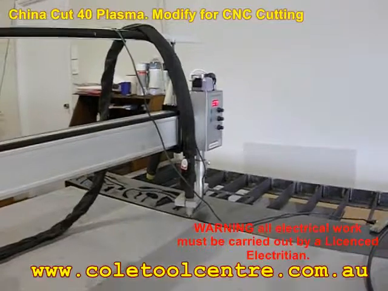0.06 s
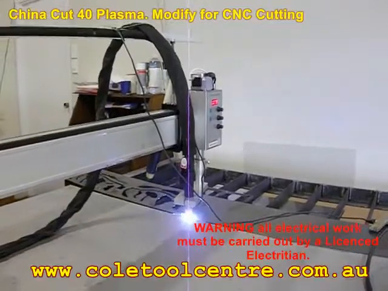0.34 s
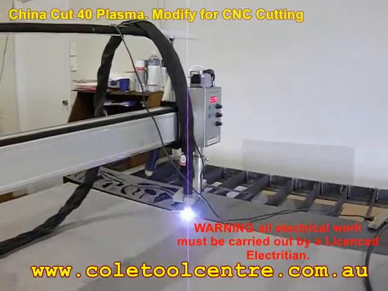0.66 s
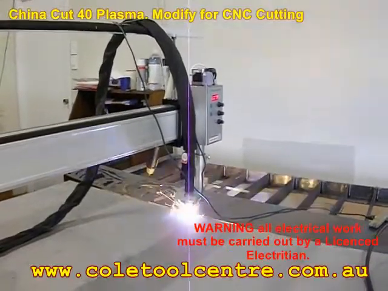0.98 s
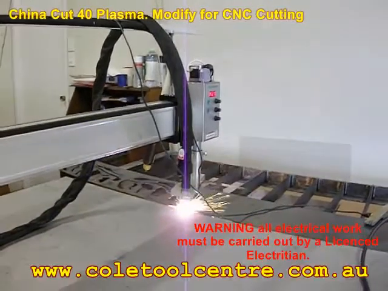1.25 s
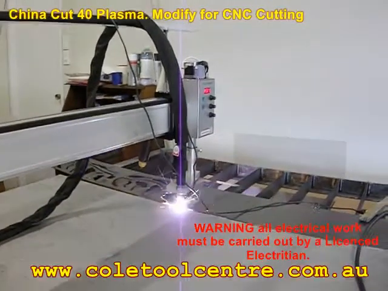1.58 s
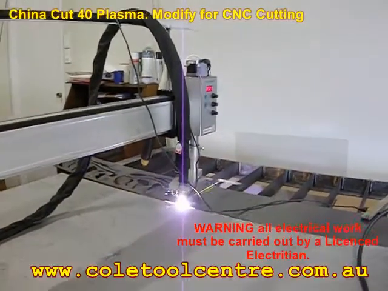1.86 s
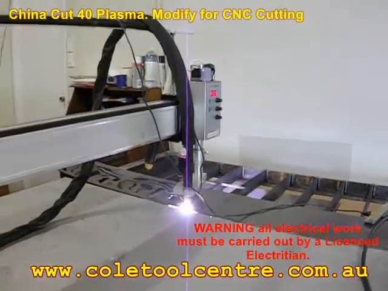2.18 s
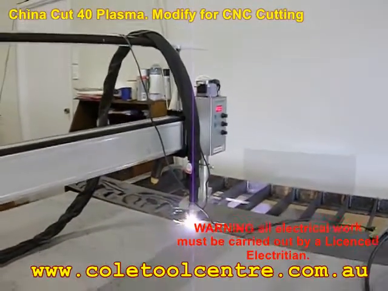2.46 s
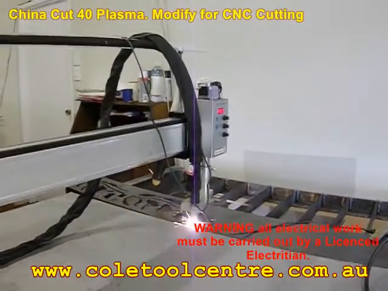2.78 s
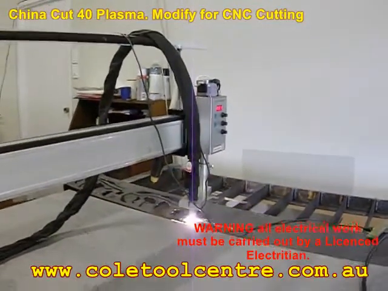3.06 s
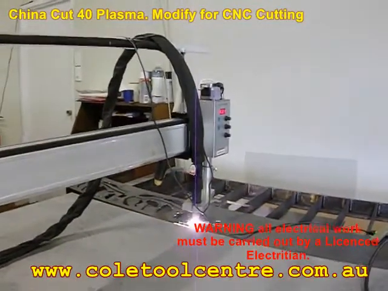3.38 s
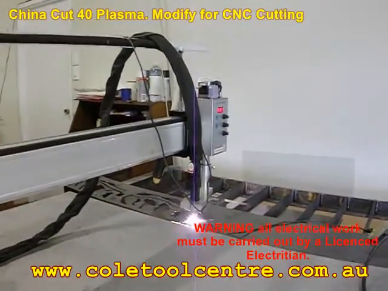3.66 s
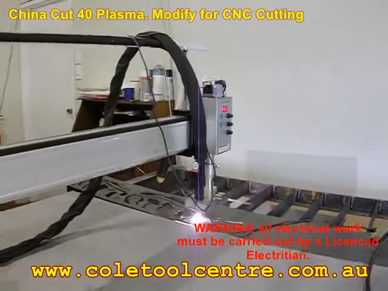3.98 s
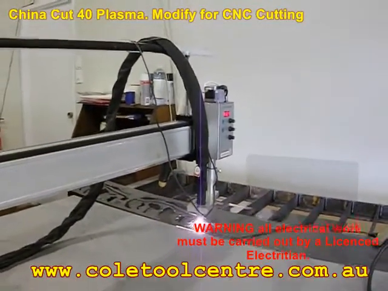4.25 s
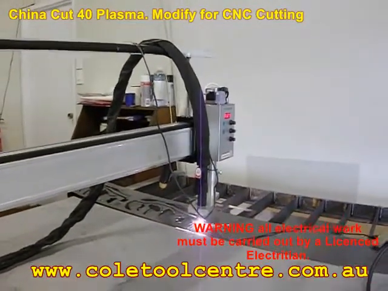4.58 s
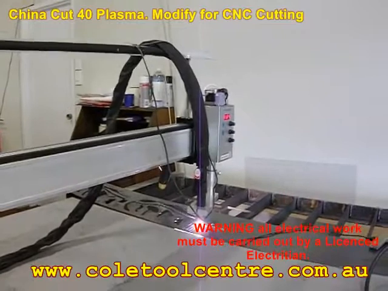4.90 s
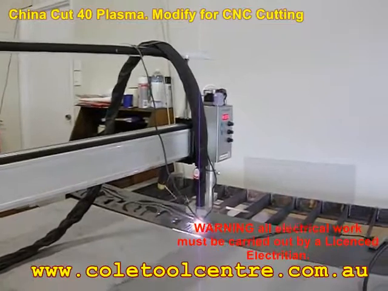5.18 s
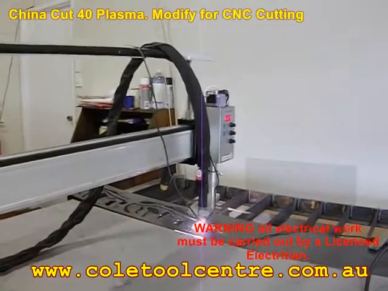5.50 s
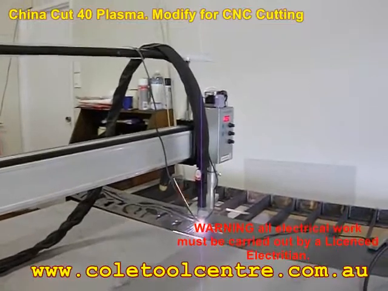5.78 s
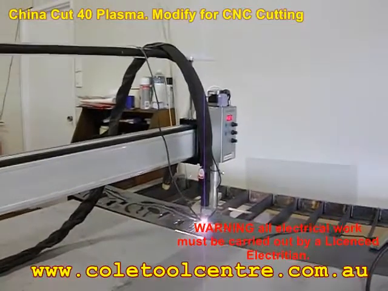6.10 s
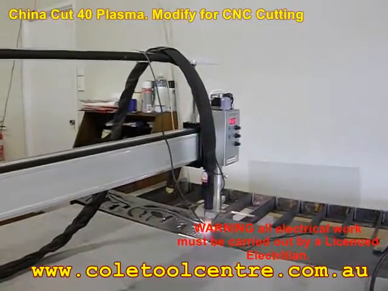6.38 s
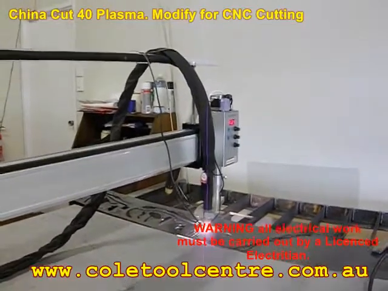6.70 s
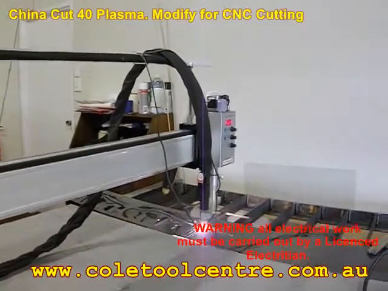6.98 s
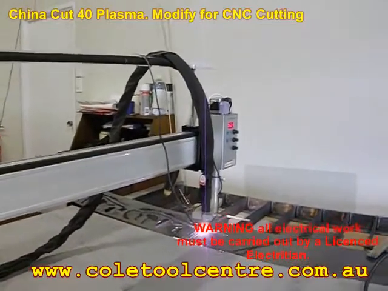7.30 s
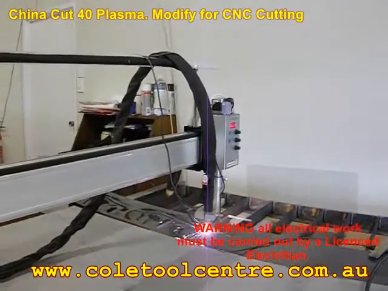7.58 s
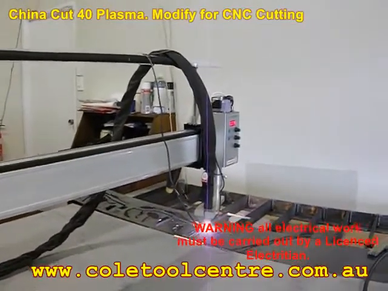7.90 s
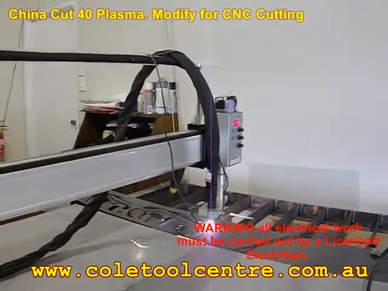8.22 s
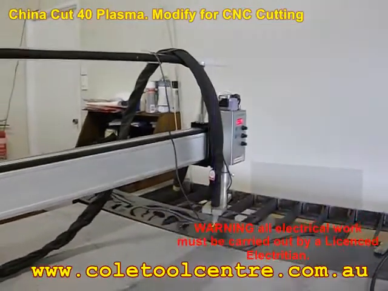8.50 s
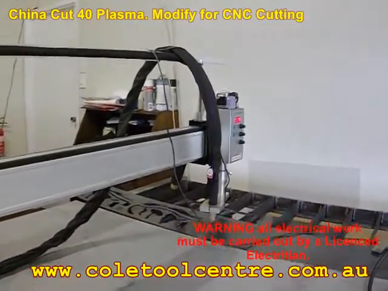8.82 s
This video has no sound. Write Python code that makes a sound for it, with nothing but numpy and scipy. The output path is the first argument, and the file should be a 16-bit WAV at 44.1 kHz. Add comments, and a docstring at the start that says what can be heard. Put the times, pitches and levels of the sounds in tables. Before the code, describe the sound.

A low puff of draught hits the microphone and an air valve clacks. A plasma torch lights almost at once and cuts steel plate with a loud, bright hiss that surges and spits, the metal ringing along. Near the end the arc goes out and the air blows on, smoother and duller. Gusts keep thumping on the single microphone in a slightly echoing workshop.

```python
"""First comes a low puff of draught on the microphone and the clack of an air valve opening.
Air rushes from a plasma torch, its arc strikes, and the hot jet hisses, surging and spitting as it
cuts a steel plate. The steel rings along and the workshop echoes. Near the end the arc goes out and
the air blows on, duller. Gusts keep buffeting the single microphone, over steady workshop noise."""
import sys
import numpy as np
from scipy import signal
from scipy.fft import rfft, irfft, next_fast_len
from scipy.io import wavfile
from scipy.ndimage import uniform_filter1d

SR = 44100
rng = np.random.default_rng(int(sys.argv[2]) if len(sys.argv) > 2 else 0)


def generate_wav(sig):
    """Save sig (samples, or channels by samples) to the path in sys.argv[1] as 16-bit PCM at SR."""
    pcm = np.round(np.clip(np.atleast_2d(sig).T, -1, 1) * 32767).astype(np.int16)
    wavfile.write(sys.argv[1], SR, pcm)


N = 399105
TIME = np.arange(N) / SR
ARC_ON_S, ARC_OFF_S = 0.2994, 8.49

# strength of the jet along the cut: (time [s], relative level [dB])
JET_LEVELS = [(0.31, -20.5), (0.65, -18.5), (1.0, -20.5), (1.3, -18.5), (1.65, -21), (2.2, -20),
              (2.52, -22.5), (2.72, -20), (3.7, -20.5), (3.92, -22), (4.3, -19.5), (4.7, -19.5),
              (4.96, -23), (5.1, -20.5), (6.75, -19.5), (7.0, -20.5), (7.9, -21), (9.05, -21)]
# the strongest flares of the jet: (time [s], rise [dB])
JET_FLARES = [(0.522, 2.5), (0.708, 1.5), (1.908, 2), (1.985, 2.5), (2.219, 1.5), (2.771, 3), (3.045, 2.3),
              (3.856, 2.2), (4.344, 2.5), (4.752, 2.5), (4.899, 4), (5.482, 2.5), (6.161, 2), (6.388, 1.5),
              (7.189, 3.5), (7.872, 2), (7.953, 3.5), (8.353, 3.5)]
# brief dips in the hiss: (time [s], depth [dB])
JET_DIPS = [(0.78, 1.5), (4.83, 1.5), (6.06, 1.5), (6.95, 1.5), (8.05, 3), (8.56, 3), (8.85, 2.5)]
# the hiss of the lit torch: (frequency [Hz], relative level [dB])
ARC_SPECTRUM = [(400, -21), (800, -15), (1100, -8.5), (1950, -3.5), (2200, -5.5), (2800, -3), (3450, -4.5),
                (4300, -1.6), (5300, 0), (5800, -1.5), (6800, 0), (8500, -3), (9200, -2.8), (9800, -5),
                (10400, -5), (11000, -12.5), (11800, -19.5), (14000, -43)]
# the air after the arc goes out: (frequency [Hz], relative level [dB])
AIR_SPECTRUM = [(500, -10), (900, -10.5), (1500, -4), (2300, -3.5), (2800, -1), (3400, -2.5), (5000, 0.5),
                (5900, -3), (6700, -1), (7900, -5.5), (10300, -8.5), (11800, -24), (14000, -44)]
# notes of the hollow between nozzle and cut: (pitch [Hz], width [Hz], relative level [dB])
CAVITY_NOTES = [(2724, 89, -23.5), (4547, 260, -18), (5080, 140, -18.5), (7120, 140, -22.5),
                (8260, 190, -22.5), (9010, 260, -17.5)]
# clacks of the air valve: (time [s], relative peak [dB])
VALVE_CLACKS = [(0.114, -23), (0.1312, -16), (0.1334, -9)]
# the valve and the air before the arc: (frequency [Hz], relative level [dB])
VALVE_SPECTRUM = [(500, 4), (1100, -5), (2300, -3.5), (2800, 5.5), (3350, -5), (3850, 5.5), (4300, -3),
                  (5080, -1), (5600, -4), (7600, -9), (10300, -13), (11000, -23), (14000, -68)]
# ringing notes of the plate and its table: (pitch [Hz], width [Hz], gain [dB])
STEEL_NOTES = [(966, 20, -6), (1070, 16, 2.5), (1166, 8.1, -3), (1200, 11, -2.5), (1483, 36, -12),
               (1610, 18, -4), (1723, 17, -8.5), (2032, 15, -3), (2420, 7.3, -6), (2430, 16, -13),
               (3080, 37, -9), (3180, 25, -10.5), (3690, 9.8, -7), (4130, 44, -4), (4900, 34, -4),
               (6250, 17, -6), (8450, 40, -6)]
# the draught before its highs are faded: (frequency [Hz], relative level [dB])
DRAUGHT_SPECTRUM = [(15, -11), (45, -2), (130, -0.5), (300, -1.5), (600, -2.5), (1500, 2)]
# gusts: (start [s], length [s], relative level [dB], upper edge of the sound [Hz])
DRAUGHT_GUSTS = [(0.095, 0.13, -21.5, 290), (0.966, 0.085, -30, 340), (1.214, 0.21, -24, 524),
                 (1.53, 0.23, -26, 500), (2.47, .26, -27.5, 393), (3.37, 0.47, -26.5, 520),
                 (4.7, 0.28, -30, 344), (5.203, 0.055, -29, 310), (5.926, 0.39, -28.5, 367),
                 (7.258, 0.25, -26.5, 450), (7.767, 0.046, -29, 380), (8.22, 0.18, -28.5, 280),
                 (8.5, 0.11, -22.5, 305), (8.95, .1, -29, 240)]
# the weaker draught between gusts: (time [s], relative level [dB])
DRAUGHT_LULL = [(0, -24.5), (0.4, -42), (0.8, -43.5), (1.8, -35), (2.15, -36.5), (3.0, -36.5), (3.2, -36),
                (4.6, -33.5), (5.45, -39), (5.7, -33), (6.5, -41), (6.95, -33), (8.07, -39), (8.5, -31),
                (9.05, -33)]
# single hard thumps of the draught: (time [s], relative peak [dB], pitch [Hz])
DRAUGHT_THUMPS = [(0.107, -12.5, 81), (0.149, -14.5, 240), (0.206, -8, 108), (0.238, -19, 134),
                  (1.31, -15, 250), (1.749, -15, 393), (1.914, -14, 199), (2.086, -16, 230),
                  (2.185, -22, 199), (2.599, -12.5, 260), (2.731, -11.5, 346), (4.252, -18, 300),
                  (4.742, -13, 222), (4.932, -10.5, 315), (5.341, -17, 320), (5.921, -13.5, 308),
                  (6.31, -15, 190), (7.546, -9.5, 230), (7.811, -10, 417), (8.242, -11.5, 150),
                  (8.432, -9.5, 260), (8.627, -11, 387), (8.821, -9.5, 260)]
# steady noise of the workshop: (frequency [Hz], relative level [dB])
SHOP_SPECTRUM = [(30, 7.5), (120, -1), (350, -17.5), (1000, -1.5), (1400, -4.5), (2300, -14), (3500, -14.5),
                 (6000, -25), (10500, -33), (12000, -52)]


def jet(air_db, roar_db):
    """The arc makes the jet bright and unsteady; without it the air blows smooth and duller."""
    burning = 1 - ramp(ARC_OFF_S, 0.03)
    arc = arc_hiss(level_db=-1.13, spatter_db=-7.5, flutter_db=0.71, shimmer_db=-0.5)
    air = from_db(air_db) * smooth_noise(AIR_SPECTRUM)
    roar = from_db(roar_db) * noise_band(450, 1000)   # the largest swirls of air
    level = from_db(in_time(JET_LEVELS) + surges()) * ramp(ARC_ON_S, 0.006)
    return level * (np.sqrt(burning) * arc + np.sqrt(1 - burning) * air + roar)


def arc_hiss(level_db, spatter_db, flutter_db, shimmer_db, pierced_s=1.26, dull_db=4):
    """The lit jet hisses and spits; its highs waver, and are duller until the plate is pierced."""
    flow = rng.standard_normal(N)
    flow += from_db(spatter_db) * spatter(per_s=110, spread_db=6, burst_s=0.0019)
    hiss = coloured(flow, ARC_SPECTRUM) + cavity_song(wander_db=7.5)
    hiss *= from_db(level_db + flutter_db * drift(46))
    highs = filtered(hiss, 8800, "high", order=1)
    highs_db = shimmer_db * drift(10) - dull_db * (1 - ramp(pierced_s, 0.2))
    return hiss + highs * (from_db(highs_db) - 1)


def surges(per_s=11.5, jitter=0.1975, height_db=2.5, count=160):
    """The jet pulses as melted steel builds up and blows clear; gives the swing in dB."""
    gap_luck, height_luck = rng.standard_normal((count, 2)).T
    times = np.cumsum(np.exp(jitter * gap_luck)) / per_s
    heights = height_db * (1 + 0.14 * height_luck)
    pulses = swells(zip(times, heights), width_s=0.026)
    strike = swells([(ARC_ON_S + 0.016, 5)], width_s=0.018)   # the arc overshoots as it lights
    strong = strike + swells(JET_FLARES, width_s=0.026) - swells(JET_DIPS, width_s=0.056)
    return strong + (pulses - pulses.mean()) * np.exp(-np.abs(strong))   # small pulses give way


def spatter(per_s, spread_db, burst_s):
    """Melted drops torn from the cut make tiny noise bursts of uneven size."""
    sizes = from_db(spread_db * rng.random(N))
    drops = (rng.random(N) < per_s / SR) * sizes ** 2
    power = signal.lfilter([1], [1, -np.exp(-1 / (burst_s * SR))], drops + 1e-18)   # each dies away
    return rms_one(np.sqrt(power) * rng.standard_normal(N))


def cavity_song(wander_db):
    """The jet sings in the hollow of the cut; notes come and go as the melt changes its shape."""
    out = np.zeros(N)
    for hz, width_hz, level_db in CAVITY_NOTES:
        tone = noise_band(hz - width_hz / 2, hz + width_hz / 2)
        wander = from_db(wander_db * np.tanh(drift(6.7)))
        out += from_db(level_db) * rms_one(tone * wander)
    return out


def air_valve(air_db, clack_db, clack_s, swell_s=0.057):
    """The valve clacks; air rushes in, settles, then swells until the arc takes over."""
    settle_db = 4.3 * ramp(0.2, 0.02)
    swell_db = 6.5 * ramp(ARC_ON_S - swell_s, swell_s)
    last_clack_s = VALVE_CLACKS[-1][0]
    flowing = ramp(last_clack_s, 0.003) * (1 - ramp(ARC_ON_S, 0.02))
    level = from_db(air_db - settle_db + swell_db) * flowing
    for at_s, peak_db in VALVE_CLACKS:
        fade = (TIME >= at_s) * np.exp(-np.abs(TIME - at_s) / clack_s)
        level += from_db(peak_db + clack_db) * fade
    return level * smooth_noise(VALVE_SPECTRUM)


def nozzle_whistle(at_s, width_s, hz, width_hz, level_db):
    """The nozzle sings briefly while the arc settles."""
    tone = noise_band(hz - width_hz / 2, hz + width_hz / 2)
    return swells([(at_s, from_db(level_db))], width_s) * tone


def ringing_steel(x):
    """The jet sets the plate and its table ringing at their own notes."""
    out = x.copy()
    for hz, width_hz, gain_db in STEEL_NOTES:
        decay = np.exp(-np.pi * width_hz / SR)   # narrower notes ring longer
        feed = np.array([1, 0, -1]) * (1 - decay ** 2) / 2
        feedback = [1, -2 * decay * np.cos(2 * np.pi * hz / SR), decay ** 2]
        out += from_db(gain_db) * signal.lfilter(feed, feedback, x)
    return out


def draught(gain_db, lump_db, puff_db, edge_octaves):
    """Swirls of air hit the microphone in lumps; the stronger ones reach higher in pitch."""
    lumps = drift(48)
    strength, edge_hz = gusts()
    edge_hz = edge_hz * 2 ** (edge_octaves * lumps)
    noise = smooth_noise(DRAUGHT_SPECTRUM)
    wind, below = 0, 0
    for top_hz in 100 * 2 ** (np.arange(10) / 2):   # half-octave slices, fading above the edge
        up_to_top = signal.sosfiltfilt(signal.butter(4, top_hz, fs=SR, output="sos"), noise)
        wind += (up_to_top - below) / np.sqrt(1 + (top_hz / edge_hz) ** 5)
        below = up_to_top
    wind *= from_db(lump_db * lumps)
    wind /= np.sqrt(uniform_filter1d(wind ** 2, size=SR // 6))   # keep only the quick lumps
    return strength * from_db(gain_db + puff_db * drift(6.3)) * wind


def gusts(rise_db_per_s=75, fall_db_per_s=112, lull_edge_hz=305):
    """Each gust builds, holds and drops away; gives the strength and the sound's upper edge in Hz."""
    power = from_db(in_time(DRAUGHT_LULL)) ** 2
    weighted_edge = power * lull_edge_hz
    for start_s, length_s, level_db, edge_hz in DRAUGHT_GUSTS:
        before_s = np.maximum(start_s - TIME, 0)
        after_s = np.maximum(TIME - start_s - length_s, 0)
        gust = from_db(level_db - rise_db_per_s * before_s - fall_db_per_s * after_s) ** 2
        power += gust
        weighted_edge += gust * edge_hz
    return np.sqrt(power), weighted_edge / power


def thumps(gain_db, cycles):
    """A hard swirl of air swells and dies within a few cycles of its own pitch."""
    out = np.zeros(N)
    for at_s, peak_db, hz in DRAUGHT_THUMPS:
        near = np.abs(TIME - at_s) < 0.08
        swirl = filtered(rng.standard_normal(near.sum()), [hz / 2, hz * 1.39], "band")
        swirl *= np.exp(-np.abs(TIME[near] - at_s) * hz / cycles)
        out[near] += from_db(peak_db + gain_db) * swirl / np.abs(swirl).max()
    return out


def workshop_echoes(x, echo_db, fade_s, dull_hz, count=90):
    """Sound bounces off the machine frame, floor and walls and comes back duller."""
    delays_s = np.geomspace(0.003, 0.2, count) * rng.uniform(0.85, 1.15, count)
    sizes = np.sqrt(delays_s) * from_db(-60 * delays_s / fade_s)
    bounces = np.zeros(SR)
    bounces[(delays_s * SR).astype(int)] = rng.choice([-1, 1], count) * sizes
    echoes = signal.fftconvolve(x, bounces / np.linalg.norm(bounces))[:N]
    return x + from_db(echo_db) * filtered(echoes, dull_hz, "low", order=1)


def workshop_noise(level_db):
    """A faint, steady rumble and rush fills the room."""
    return from_db(level_db) * smooth_noise(SHOP_SPECTRUM)


def from_db(db):
    """Turn decibels into a multiplier."""
    return 10 ** (np.asarray(db) / 20)


def rms_one(x):
    """Scale to an average strength (rms) of 1."""
    return x / np.sqrt(np.mean(x ** 2) + 1e-20)


def in_time(rows):
    """Join (time, value) points with straight lines."""
    return np.interp(TIME, *np.transpose(rows))


def ramp(at_s, rise_s):
    """Climb from 0 to 1 and stay there."""
    return np.clip((TIME - at_s) / rise_s, 0, 1)


def swells(rows, width_s):
    """A bell-shaped bump for each (time [s], height)."""
    out = np.zeros(N)
    for at_s, height in rows:
        near = slice(*np.searchsorted(TIME, [at_s - 3 * width_s, at_s + 3 * width_s]))
        out[near] += height * np.exp(-((TIME[near] - at_s) / width_s) ** 2)
    return out


def filtered(x, hz, kind, order=2):
    """Keep the lows, the highs or a band."""
    return signal.sosfilt(signal.butter(order, hz, kind, fs=SR, output="sos"), x)


def noise_band(low_hz, high_hz):
    """Noise between two frequencies; a narrow band sounds like a note."""
    return rms_one(filtered(rng.standard_normal(N), [low_hz, high_hz], "band"))


def drift(rate_hz):
    """A random wobble of strength 1, up to about the given speed."""
    hz = np.arange(N // 2 + 1) * SR / N
    return rms_one(irfft(rfft(rng.standard_normal(N)) / (1 + (hz / rate_hz) ** 4), N))


def coloured(x, spectrum):
    """Set a noise's balance of lows and highs, at strength 1."""
    size = next_fast_len(N)
    hz = np.maximum(np.arange(size // 2 + 1) * SR / size, 1)
    points_hz, points_db = np.transpose(spectrum)
    gain = from_db(np.interp(np.log(hz), np.log(points_hz), points_db))
    return rms_one(irfft(rfft(x, size) * gain, size)[:N])


def smooth_noise(spectrum):
    """An even rush, like flowing air."""
    return coloured(rng.standard_normal(N), spectrum)


def scene():
    """Torch, steel, room and draught, the same in both channels."""
    torch = jet(air_db=-0.8, roar_db=-21)
    torch += air_valve(air_db=-29, clack_db=-7, clack_s=0.0028)
    torch += nozzle_whistle(at_s=0.455, width_s=0.035, hz=2740, width_hz=70, level_db=-31)
    torch = workshop_echoes(ringing_steel(torch), echo_db=-8.5, fade_s=0.25, dull_hz=9050)
    shop = workshop_noise(level_db=-38)
    wind = draught(gain_db=-0.94, lump_db=3.5, puff_db=1, edge_octaves=0.096)
    wind += thumps(gain_db=-1.5, cycles=2.17)
    return np.tile((torch + shop + wind) * ramp(0, 0.0013), (2, 1))


def record(dry):
    """Cut the highs steeply above 11900 Hz."""
    return signal.sosfilt(signal.ellip(12, 0.1, 90, 11900, fs=SR, output="sos"), dry)


dry = scene()
out = record(dry)
generate_wav(out)
```